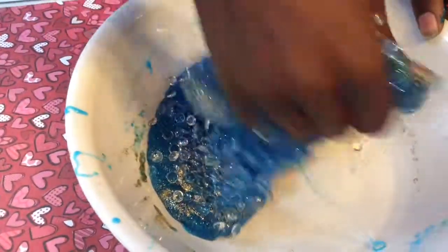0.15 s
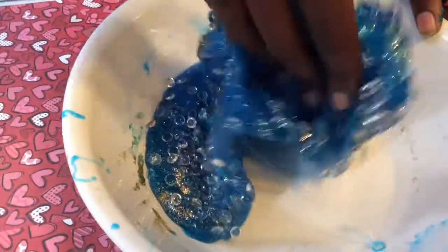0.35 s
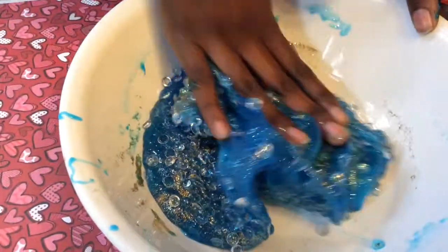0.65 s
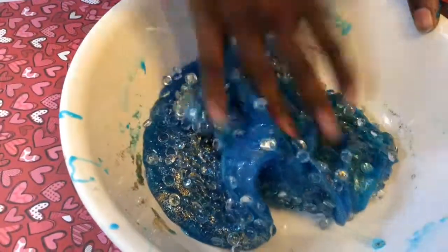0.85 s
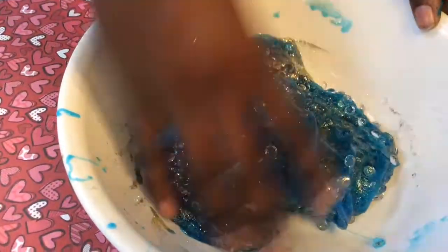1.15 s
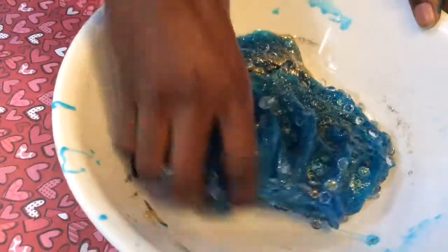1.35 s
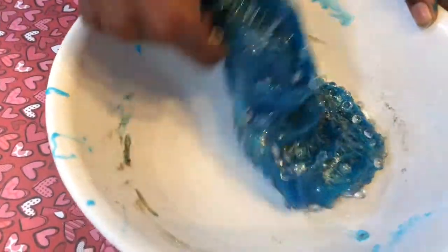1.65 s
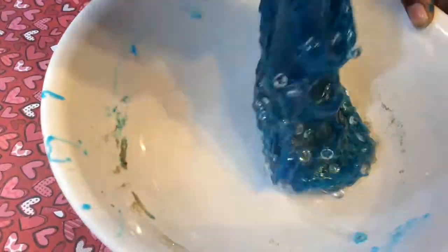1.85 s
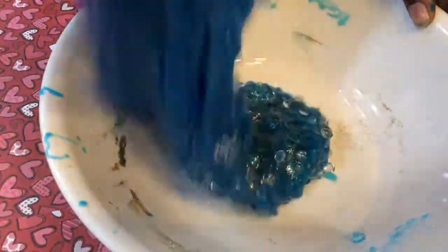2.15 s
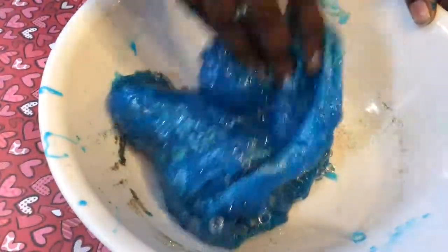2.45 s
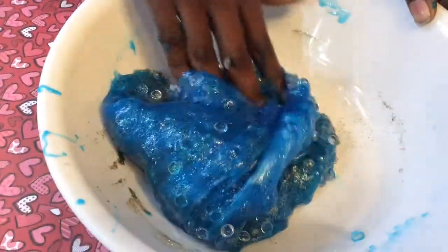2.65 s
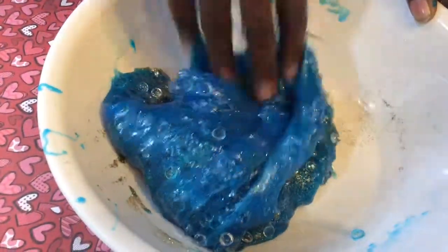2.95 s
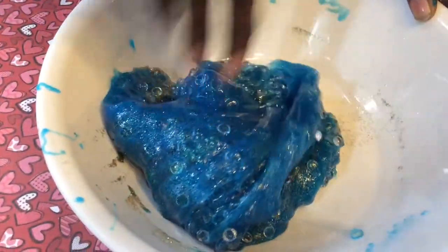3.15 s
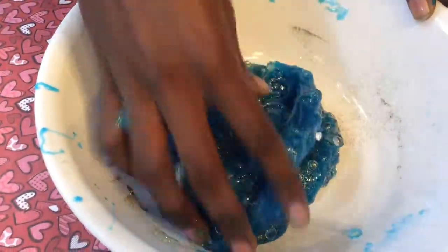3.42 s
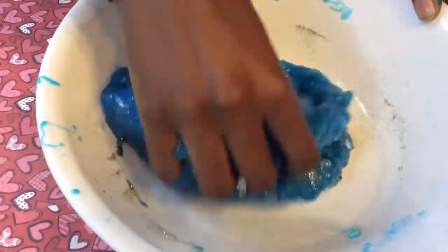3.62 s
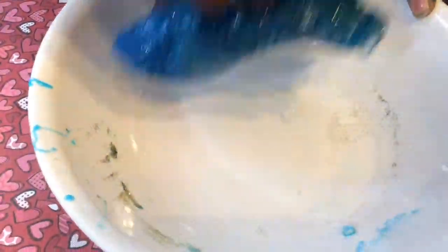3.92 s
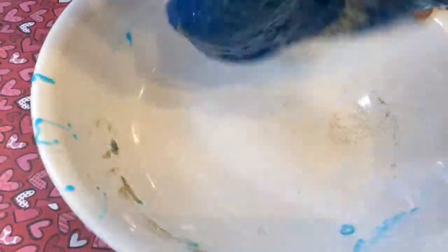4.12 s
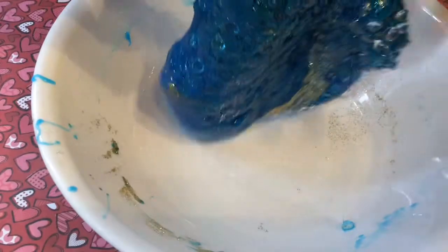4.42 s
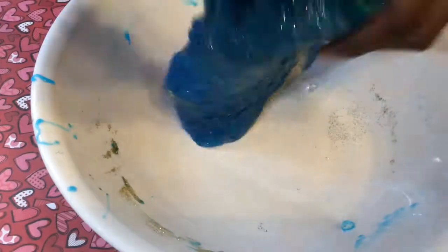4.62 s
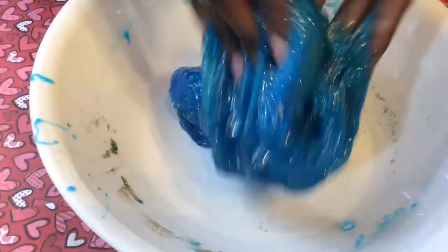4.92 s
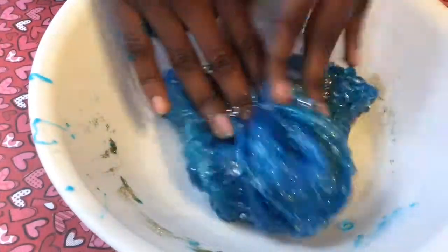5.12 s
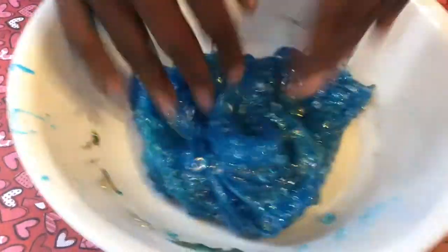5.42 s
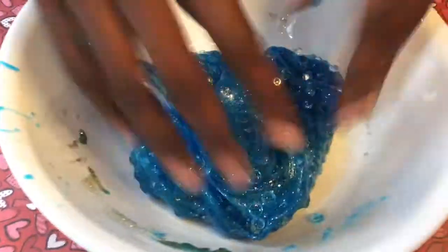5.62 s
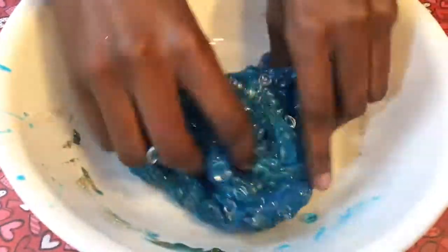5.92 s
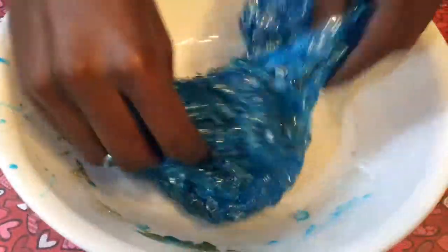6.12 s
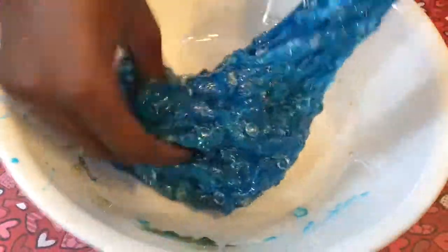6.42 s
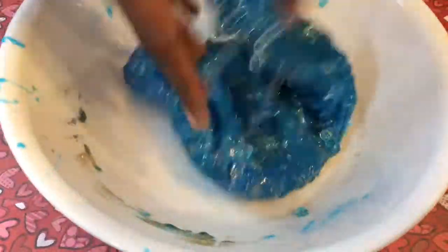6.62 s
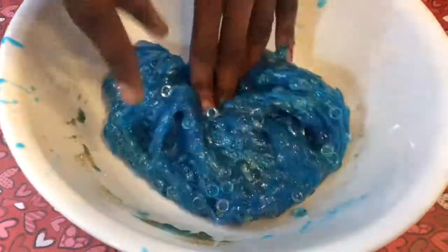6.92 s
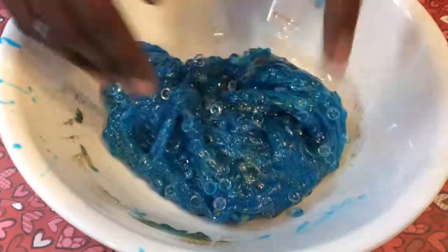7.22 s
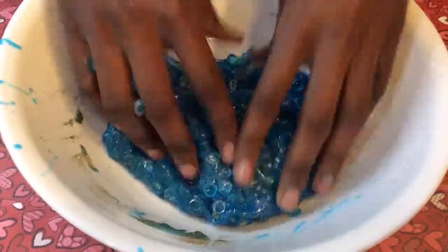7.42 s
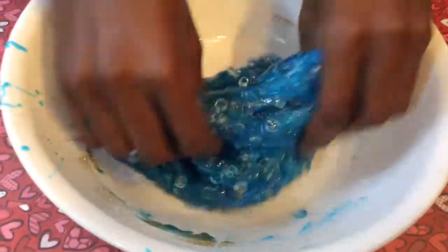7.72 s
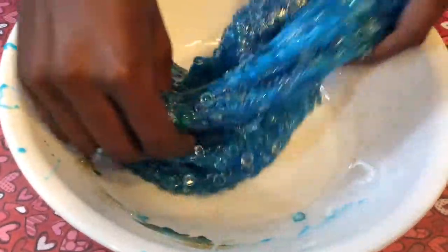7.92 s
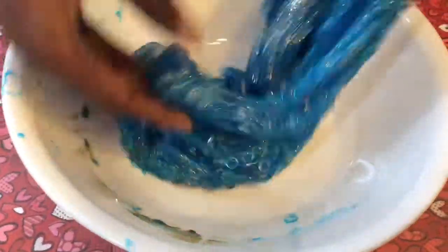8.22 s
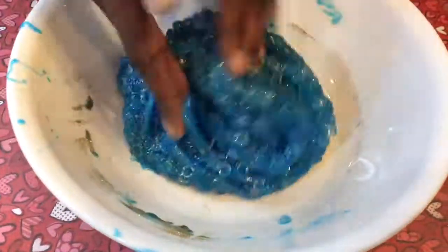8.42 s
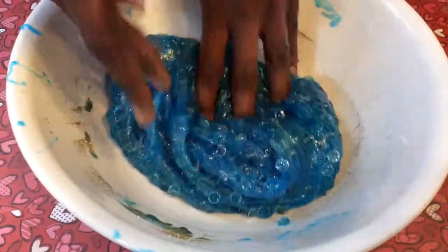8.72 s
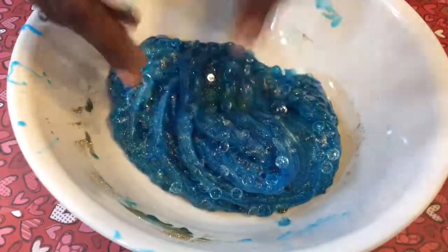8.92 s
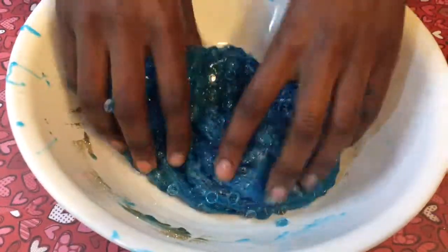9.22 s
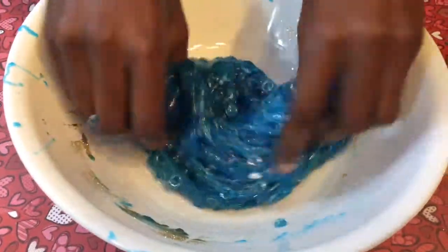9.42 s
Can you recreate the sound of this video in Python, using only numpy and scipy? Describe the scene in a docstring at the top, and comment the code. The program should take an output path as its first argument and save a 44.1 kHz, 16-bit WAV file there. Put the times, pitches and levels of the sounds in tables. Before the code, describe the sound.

Hands squash and stretch bead-filled slime in a bowl, with bright snapping pops, dense crackle, wet squelches and a loose bead bouncing to a rattle.

```python
"""Bead-filled slime is kneaded, lifted and stretched by two hands in a bowl, close to the microphone.
Air pockets burst as short coloured noise; films tear as crackle, and air squelches through the mass.
Flops and gulps are damped low notes that rise in pitch. Beads knock on the bowl and ring its modes,
and a loose bead bounces to a rattle. Behind it is steady room noise with a faint mains hum."""
import sys
import numpy as np
from scipy import signal
from scipy.fft import rfft, irfft
from scipy.io import wavfile
from scipy.ndimage import uniform_filter1d

SR = 44100
rng = np.random.default_rng(int(sys.argv[2]) if len(sys.argv) > 2 else 0)


def master(y):
    """Save y as 16-bit WAV."""
    cut = np.clip(np.atleast_2d(y).T, -1, 1)
    pcm = np.round(cut * 32767)  # scale
    wavfile.write(sys.argv[1], SR, pcm.astype(np.int16))


N = 421155
TIME = np.arange(N) / SR

# bright spectrum of a crack: (frequency [Hz], density [dB per Hz, relative])
CRACK_SPECTRUM = [(2500, -36.5), (4500, -27), (6100, 2.5), (6900, -3), (8100, 6.5), (9900, 0.5), (10900, 8),
                  (12600, -0.5), (14700, 1.5), (16000, -13)]
# duller spectrum of the body under a crack: (frequency [Hz], density [dB per Hz, relative])
BODY_SPECTRUM = [(200, -17), (900, -14.5), (1500, 1), (2500, 1), (4200, 0.5), (6000, 4.5), (9000, -19)]
# ringing modes of the bowl: (frequency [Hz], relative level [dB], t60 [s])
BOWL_MODES = [(727, -43, .9), (1373, -38, 1.6), (2169, -17, .58), (3095, -19, .2), (4105, -5, .11),
              (5190, -8, .07), (6400, -4, .08), (7580, -2, .07), (7930, 1, .07), (8300, -1, .06),
              (8860, 1, .07), (10220, 2, .07), (10860, 2, .06), (11660, 2, .06), (12950, -3, .06),
              (13220, 2, .07), (14100, -2, .05), (14860, -2, .06), (15160, -2, .06)]


def from_db(db):
    """Decibels to gain."""
    return 10 ** (np.asarray(db) / 20)


def rms_one(x):
    """Scale to unit power."""
    return x / np.sqrt(np.mean(x ** 2) + 1e-20)


def spectrum_gain(spectrum, size):
    """Gain at each FFT bin, interpolated in dB over log frequency."""
    hz, db = np.transpose(spectrum)
    bins_hz = np.fft.rfftfreq(size, 1 / SR)
    return from_db(np.interp(np.log(bins_hz + 1), np.log(hz), db))


def colour(x, spectrum):
    """Causal (minimum-phase) filter of unit power gain that follows a spectrum."""
    size = 1024
    cepstrum = irfft(np.log(spectrum_gain(spectrum, size)))[:size // 2]
    response = irfft(np.exp(rfft(2 * cepstrum, size)))  # folded cepstrum gives minimum phase
    return signal.fftconvolve(x, response / np.linalg.norm(response))[:len(x)]


def drift(rate):
    """Smooth random wander of unit rms, with this many turning points a second."""
    knots = rng.standard_normal(4000)
    return rms_one(np.interp(TIME * rate, np.arange(len(knots)), knots))


def dying(t60, seconds):
    """Exponential decay that falls 60 dB in t60 seconds."""
    return from_db(-60 * TIME[:int(seconds * SR)] / t60)


def at_level(hit, db):
    """Give the first 10 ms of a hit this rms level."""
    onset_rms = np.sqrt(np.mean(hit[:SR // 100] ** 2))
    return hit * from_db(db) / onset_rms


def add(track, s, sound):
    """Mix a sound into a track at a moment in seconds."""
    start = max(0, int(s * SR))
    track[start:start + len(sound)] += sound[:N - start]


def filtered(x, order, hz, kind):
    """Butterworth filter."""
    return signal.sosfilt(signal.butter(order, hz, kind, fs=SR, output="sos"), x)


def burst(spectrum, t60, vary_db, snap):
    """A sharp snap and its short noisy decay; every cavity colours it in its own way."""
    fall = dying(t60, seconds=0.06) + snap * dying(0.003, seconds=0.06)
    noise = fall * rng.choice([-1, 1], len(fall))
    own_spectrum = [(hz, db + vary_db * rng.standard_normal()) for hz, db in spectrum]
    return colour(noise, own_spectrum)


def ringing(modes, vary_db):
    """Struck modes as decaying sines; the spot that is hit matters most to the high ones."""
    out, t = 0, TIME[:SR]
    for hz, db, t60 in modes:
        pitch_chance, level_chance = min(1, hz / 8000) * rng.standard_normal(2)
        pitch = hz * (1 + 0.0015 * pitch_chance)
        tone = np.sin(2 * np.pi * (pitch * t + rng.random()))
        out = out + from_db(db + vary_db * level_chance) * dying(t60, seconds=1) * tone
    return out


def grains(per_s, spread_db, clump_db):
    """Tiny ruptures of uneven size that come in clumps; power is evened over a tenth of a second."""
    chance = per_s * from_db(clump_db * drift(rate=60)) / SR
    born = rng.random(N) < chance
    size_db = spread_db * np.minimum(rng.exponential(1, N), 4)
    clicks = born * from_db(size_db) * rng.choice([-1, 1], N)
    local_power = uniform_filter1d(clicks ** 2, size=4410)
    return clicks / np.sqrt(np.abs(local_power) + 1e-4)


def background(noise_db):
    """Mains hum of gently wavering level over the steady noise of the room."""
    # noise of the room: (frequency [Hz], density [dB per Hz, relative])
    room_spectrum = [(20, -25), (55, -9), (115, -6.5), (170, -11.5), (440, -22.5), (950, -29),
                     (5000, -35.5), (8000, -32.5), (16000, -49.5)]
    # mains hum: (frequency [Hz], mean rms level [dB])
    hum_tones = [(120, -54), (221, -73.5)]
    white = rng.standard_normal(N)
    air = rms_one(irfft(rfft(white) * spectrum_gain(room_spectrum, N), N))
    hum = 0
    for hz, db in hum_tones:
        level = from_db(db + 0.5 * drift(rate=4.0))
        hum = hum + level * np.sqrt(2) * np.sin(2 * np.pi * hz * TIME)
    return from_db(noise_db) * air + hum


def room(x, t60, wet_db):
    """Dense reflections from the bowl and the near walls, as a decaying noise tail."""
    fall = dying(t60, seconds=0.28)
    tail = fall * rng.standard_normal(len(fall)) * (TIME[:len(fall)] > 0.003)  # 3 ms gap first
    return x + from_db(wet_db) * signal.fftconvolve(x, tail / np.linalg.norm(tail))[:N]


def strike(modes, damping, crack_db, body_db):
    """A hard contact: a tick, a dull knock and ringing modes; clinging slime (0-1) stills the low ones most."""
    crack_trim_db, body_trim_db = -1.5, -5
    held = []
    for hz, db, t60 in modes:
        low_cut_db = 12 * damping * (hz < 2600)
        held.append((hz, db - low_cut_db, t60 / (1 + damping * t60 / 0.09)))
    tick = burst(CRACK_SPECTRUM, t60=0.02, vary_db=5.5, snap=1.5)
    knock = burst(BODY_SPECTRUM, t60=0.012, vary_db=2.5, snap=2.5)
    out = at_level(ringing(held, vary_db=2.0), crack_db + crack_trim_db)
    add(out, 0, at_level(tick, crack_db + crack_trim_db))
    add(out, 0, at_level(knock, body_db + body_trim_db))
    return out


def bowl_knocks():
    """Beads knock on the bowl: clinging slime damps the ring until the hands leave the bowl free."""
    # knocks: (time [s], crack level before the strike's trim [dB], body level before the trim [dB])
    knock_events = [(0.471, -11, -26), (1.7637, -21, -35.5), (1.8075, -20.5, -61), (1.919, -19, -46),
                    (1.9704, -28.5, -71), (3.458, -42, -74), (4.9188, -40, -48), (4.9578, -35, -48),
                    (6.745, -18, -44), (6.7726, -13, -26)]
    # the hands leave the bowl free to ring: (from [s], to [s])
    freed, touched = (6.76, 7.02)
    stilling_db_per_s = 11
    out = np.zeros(N)
    for s, crack_db, body_db in knock_events:
        add(out, s, strike(BOWL_MODES, float(s < freed), crack_db, body_db))
    # a hand slowly stills the bowl
    return out * from_db(-stilling_db_per_s * np.maximum(TIME - touched, 0))


def loose_bead():
    """A bead drops, bounces and rattles to rest; the low modes of the bowl answer each bounce faintly."""
    # bounces: (time [s], crack level before the strike's trim [dB], body level before the trim [dB])
    bounce_events = [(3.9637, -10, -15.5), (4.076, -18.5, -21.5), (4.1483, -20.5, -28.5),
                     (4.178, -31, -35.5), (4.206, -38, -36), (4.2381, -21, -37), (4.2846, -21.5, -44.5),
                     (4.323, -21.5, -64), (4.3839, -31, -70)]
    # ring of the bouncing bead: (frequency [Hz], relative level [dB], t60 [s])
    bead_modes = [(6000, -4, .05), (6300, -7, .04), (7700, 0, .04), (7990, -2, .04), (8390, -3, .035),
                  (9620, 1, .022), (10700, 0, .04), (10900, -1, .04), (12000, 4, .04), (13280, -2, .028),
                  (14720, -2, .035), (14900, -2, .035)]
    # the last small bounces run together: (from [s], to [s])
    rattle_start, rattle_end = (4.398, 4.61)
    rattle_db, rattle_fade_db_per_s = -36, 6
    body_below_tick_db, bowl_below_tick_db = 28, 41.5  # before the strike's trims
    ticks, answer = np.zeros((2, N))
    low_modes = [mode for mode in BOWL_MODES if mode[0] < 2500]
    for s, crack_db, body_db in bounce_events:
        add(ticks, s, strike(bead_modes, 0, crack_db, body_db))
        bowl_ring = ringing(low_modes, vary_db=4.0) * dying(0.46, seconds=1)
        add(answer, s, at_level(bowl_ring, crack_db - bowl_below_tick_db))
    for s in np.linspace(rattle_start, rattle_end, num=18):
        db = rattle_db - rattle_fade_db_per_s * (s - rattle_start) + rng.uniform(-4, 4)
        tick = strike(bead_modes, 0, db, db - body_below_tick_db)
        add(ticks, s + rng.uniform(-0.006, 0.006), tick)
    # a light bead makes no bass
    return answer + filtered(ticks + 1e-18, 2, 1500, "high")


def plops():
    """Blows, thuds and gulps: damped notes that rise as the pocket closes, roughened by the wet mass."""
    # soft blows of the mass, thuds of the bowl and gulps of trapped air:
    # (time [s], level before the note and noise mix [dB], starting pitch [Hz], t60 [s])
    plop_events = [(.213, -24.5, 153, 0.011), (.472, -26, 107, 0.028), (1.227, -40.5, 80, 0.29),
                   (2.917, -34, 1170, 0.08), (2.927, -28.5, 358, 0.029), (3.961, -16.5, 69.5, 0.028),
                   (3.964, -19, 187, 0.018), (3.965, -22, 653, 0.014), (5.413, -41, 350, 0.064),
                   (5.518, -47, 690, 0.021), (5.6, -52, 700, 0.041), (7.068, -38, 310, 0.07),
                   (8.401, -39, 1500, 0.061), (8.858, -41, 340, 0.11), (9.338, -30, 143, 0.036)]
    out, t = np.zeros(N), TIME[:SR // 2]
    for s, db, hz, t60 in plop_events:
        note = np.sin(2 * np.pi * hz * (t + 0.22 * t * t / t60))
        smear = rms_one(filtered(rng.standard_normal(len(t)), 2, [hz / 2, hz * 2], "band"))
        add(out, s, from_db(db) * dying(t60, seconds=0.5) * (0.55 * note + 0.6 * smear))
    return out


def pops():
    """Each larger air pocket bursts with a bright crack and a duller body."""
    # bursts: (time [s], crack level [dB], body level before the lift [dB])
    pop_events = [(0.0503, -31, -48), (0.1205, -35, -58), (0.1482, -24, -40), (0.1924, -37, -48),
                  (0.212, -15, -34), (0.2376, -31, -66), (0.3638, -19.5, -33), (0.3946, -24, -48),
                  (0.4575, -21.5, -52), (0.483, -20, -44), (0.5358, -22, -49), (0.56, -34, -42),
                  (0.573, -22, -43.5), (0.6449, -27.5, -39), (0.898, -33, -54), (1.2174, -37, -53.5),
                  (1.2234, -32.5, -46), (1.308, -39, -53), (1.3784, -45, -45), (2.101, -26, -36),
                  (2.107, -17.5, -32), (2.583, -42.5, -43.5), (2.7555, -22.5, -51.5), (3.1475, -22.5, -40),
                  (3.1791, -18, -43.5), (3.2792, -29, -54.5), (3.3453, -31, -56), (3.8468, -26.5, -72),
                  (4.8698, -41.5, -55), (5.0329, -30, -48), (5.0758, -37, -46), (5.415, -37, -42),
                  (5.9573, -38, -62), (6.225, -35.5, -52), (6.491, -36.5, -51.5), (6.5537, -29.5, -41),
                  (6.6719, -35, -63), (6.836, -25.5, -62), (6.8594, -26, -45.5), (6.8832, -26, -41),
                  (6.897, -26.5, -41.5), (7.064, -37, -45.5), (7.113, -34.5, -53.5), (7.516, -33.5, -57.5),
                  (8.19, -40, -48), (8.2763, -33, -43), (8.652, -36, -55), (8.6863, -39, -77)]
    body_lift_db = 3.5
    out = np.zeros(N)
    for s, crack_db, body_db in pop_events:
        crack = burst(CRACK_SPECTRUM, t60=0.016, vary_db=0.5, snap=0.22)
        body = burst(BODY_SPECTRUM, t60=0.022, vary_db=4.0, snap=0.63)
        add(out, s, at_level(crack, crack_db))
        add(out, s, at_level(body, body_db + body_lift_db))
    return out


def crackles(spectrum, per_s, t60, spread_db, clump_db):
    """Tiny bursts from cavities of six different colours; rms 1."""
    clicks = grains(per_s, spread_db, clump_db)
    cavity = rng.integers(0, 6, N)
    out = 0
    for k in range(6):
        pop = burst(spectrum, t60, vary_db=4.5, snap=0.55)
        out = out + signal.oaconvolve(clicks * (cavity == k), pop / np.linalg.norm(pop))[:N]
    return rms_one(out)


def small_bubbles():
    """Ten sizes of small pocket, each a resonance that rings for a few cycles; rms 1."""
    out = 0
    for hz in np.geomspace(500, 3000, num=10):
        clicks = grains(per_s=25, spread_db=1, clump_db=5)
        out = out + signal.lfilter(*signal.iirpeak(hz, 7, fs=SR), clicks + 1e-18)
    return rms_one(out)


def pressure(start, hold):
    """One squeeze in dB: it builds (a long one more slowly), sags as the air runs out and lets go."""
    attack_s, release_s = 0.031 + 0.6 * hold, 0.075  # each spans 20 dB, besides the sag
    sag_db_per_s = 23
    early = np.maximum(start - TIME, 0)
    late = np.maximum(TIME - start - hold, 0)
    sag_db = sag_db_per_s * np.maximum(TIME - start, 0)
    return -20 * (early / attack_s + late / release_s) - sag_db


def kneading():
    """Pressure tears thin films (crackle) and squeezes air through the wet mass (squelch)."""
    # the fingers press or pull the mass: (time of full pressure [s], hold [s],
    # peak fine crackle level [dB], peak wet squelch level before the wet mix [dB])
    squeeze_events = [(0.072, 0.18, -44.5, -50.5), (0.197, 0.089, -34, -51), (0.375, .02, -43, -65),
                      (0.481, 0.035, -29.5, -46), (0.61, .09, -32, -49.5), (0.708, 0.043, -39.5, -48.5),
                      (0.872, 0.046, -38.5, -49), (1.223, 0.0039, -50, -52), (1.35, 0.16, -40.5, -49),
                      (1.558, 0.14, -44.5, -47), (1.778, 0.11, -45.5, -62), (2.081, 0.029, -28, -44),
                      (2.197, 0.11, -43, -53), (2.447, 0.15, -54, -58), (2.599, 0.01, -39.5, -55),
                      (2.704, 0.16, -47, -58.5), (2.923, 0.085, -43, -44.5), (3.129, 0.02, -30, -44),
                      (3.254, 0.12, -50.5, -63), (3.46, 0.098, -55, -62.5), (3.58, 0.18, -49, -56),
                      (3.758, .1, -41.5, -44.5), (4.574, 0.055, -36.5, -52), (4.68, .25, -50, -59),
                      (5.039, 0.076, -37, -56.5), (5.185, 0.097, -45.5, -55.5), (5.415, 0.012, -33, -45),
                      (5.761, .08, -57.5, -60), (5.892, 0.12, -49.5, -54), (6.053, 0.12, -47.5, -49),
                      (6.462, 0.068, -45.5, -50), (6.553, 0.04, -34.5, -45.5), (6.664, 0.015, -39.5, -49),
                      (6.806, 0.072, -29.5, -53.5), (7.057, 0.0087, -44.5, -52), (7.56, 0.32, -49.5, -52),
                      (7.727, 0.058, -40.5, -47.5), (7.85, 0.15, -58.5, -60), (8.151, 0.067, -42.5, -49),
                      (8.297, 0.13, -42.5, -57), (8.515, 0.061, -56.5, -63), (8.667, 0.053, -44.5, -53),
                      (8.853, 0.0083, -39.5, -48.5), (9.193, 0.067, -54, -82), (9.291, 0.11, -51.5, -54),
                      (9.414, 0.37, -48, -53)]
    # spectra of torn films and of squeezed air: (frequency [Hz], density [dB per Hz, relative])
    crackle_spectrum = [(2000, -35), (3800, -5), (5200, -5), (6200, 2.5), (7000, 0), (8000, 2),
                        (10000, -2.5), (12000, 0.5), (15000, -8), (16500, -5)]
    squelch_spectrum = [(150, -14), (350, -5), (800, -5), (1700, -2), (3000, -3.5), (4500, -4), (8000, -18)]
    crackle_db = squelch_db = -73  # the resting mass still ticks faintly
    for start, hold, tear_db, air_db in squeeze_events:
        press = pressure(start, hold)
        crackle_db = np.maximum(crackle_db, tear_db + press)
        squelch_db = np.maximum(squelch_db, air_db + press)
    crackle = crackles(crackle_spectrum, per_s=800, t60=0.008, spread_db=5.5, clump_db=5)
    squelch = crackles(squelch_spectrum, per_s=500, t60=0.0095, spread_db=4.5, clump_db=3)
    wet = from_db(-3.5) * squelch + from_db(-6.5) * small_bubbles()
    return from_db(crackle_db) * crackle + from_db(squelch_db) * wet


def scene():
    """Slime, beads and bowl in the room."""
    close = bowl_knocks() + loose_bead() + plops() + pops() + kneading()
    return (room(close, t60=0.15, wet_db=-8.5) + background(noise_db=-58.5))[None]


def record(dry):
    """Deep bass is cut, peaks beyond full scale clip, and the top is cut steeply at 15.9 kHz."""
    thinned = filtered(dry, 2, 45, "high")
    top_cut = signal.ellip(10, 0.2, 90, 15900, fs=SR, output="sos")
    return signal.sosfilt(top_cut, np.clip(thinned, -1, 1))


dry = scene()
out = record(dry)
master(out)
```